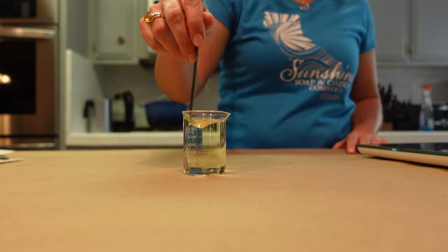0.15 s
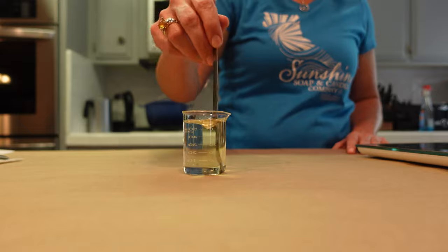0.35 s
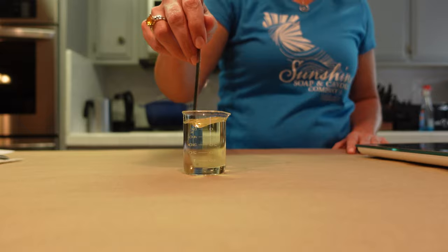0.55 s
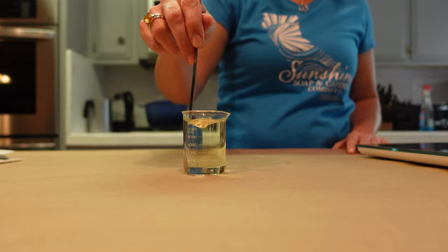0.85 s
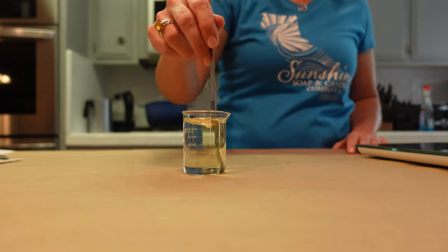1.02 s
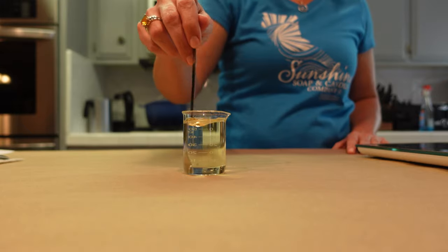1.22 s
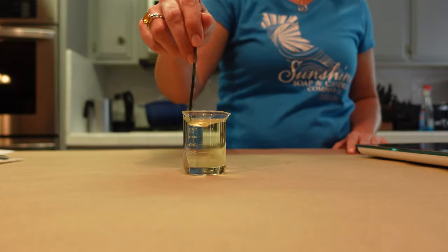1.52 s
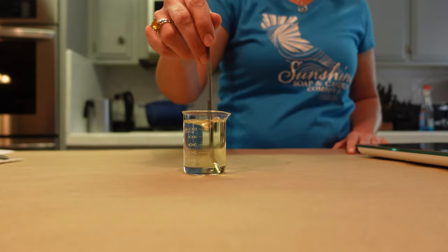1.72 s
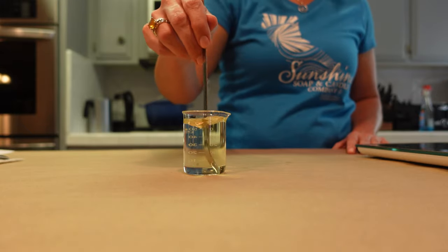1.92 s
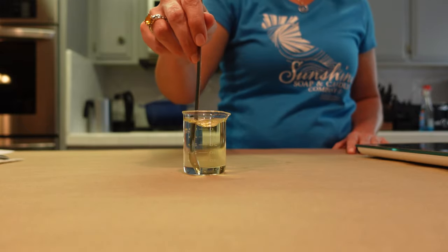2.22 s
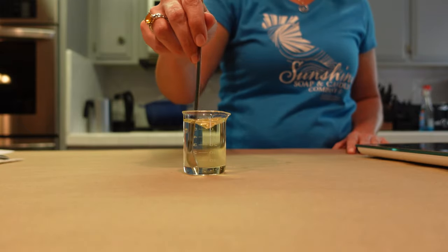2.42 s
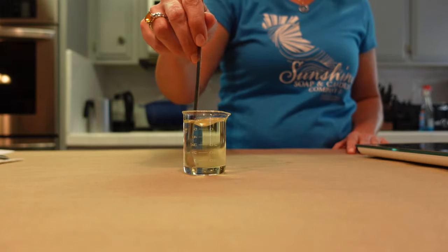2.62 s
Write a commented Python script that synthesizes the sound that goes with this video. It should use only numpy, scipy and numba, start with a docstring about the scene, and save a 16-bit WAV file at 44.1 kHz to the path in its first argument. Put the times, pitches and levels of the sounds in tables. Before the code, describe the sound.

A thin metal rod stirs liquid in a small glass beaker, already clinking at 0 s: sharp, bright, irregular hits about ten per second, ringing briefly and wavering in pitch. Light brushing and low liquid wash lie beneath, with tiny gulps near 0.7 and 1.25 s. Soft table thuds come at 1.1 and 1.7 s. Clinks thin after 1.25 s, ending at 1.9 s; faint ticks continue to 2.6 s over quiet fridge hum.

```python
"""A fridge hums over room hush and a low liquid wash as a thin metal rod begins clinking in a small glass beaker.
Hum is unsteady sines; hush and wash are shaped noise; gulps are dying sines that rise in pitch.
Each contact excites a noise crack and decaying glass modes, bent in pitch by the swirling liquid.
Soft thuds ring two table modes; a short room tail follows. After the last clink the rod ticks and knocks faintly."""
import sys
import numpy as np
from scipy import signal
from scipy.fft import rfft, irfft, next_fast_len
from scipy.io import wavfile
from scipy.ndimage import uniform_filter1d, map_coordinates
from numba import njit

SR = 44100
rng = np.random.default_rng(int(sys.argv[2]) if len(sys.argv) > 2 else 0)


def invert_db(x):
    """Field ratio 10**(x/20) for x, a level in decibels (scalar or array-like)."""
    u = np.asarray(x, float) / 20
    return 10 ** u


def persist_wave(psi):
    """Save psi, clipped to +-1, as 16-bit WAV."""
    counts = np.round(np.clip(psi, -1, 1) * 32767).astype(np.int16)
    wavfile.write(sys.argv[1], SR, np.atleast_2d(counts).T)


N = 121275

# Fridge hum lines: freq_hz, rms_db
HUM_LINES = [(56.7, -48.5), (120, -55.5), (180, -65)]
# Room hush, relative spectrum: freq_hz, density_db_per_hz
HUSH_SPECTRUM = [(30, -6.5), (100, -11.5), (160, -3), (450, -6.5), (900, -16.5), (3000, -30), (9000, -31.5),
                 (15200, -36.5), (16500, -57)]
HUSH_RMS_DB = -48

# Stirred liquid's low wash: time_s, level_db
WASH_LEVEL = [(0, -51), (1.7, -52.5), (2, -72)]
# Wash, relative spectrum: freq_hz, density_db_per_hz
WASH_SPECTRUM = [(150, -4), (350, 6.5), (1200, -14), (4500, -12.5), (8000, -36.5)]
# Gulps of the liquid: time_s, level_db (before the attack), start_pitch_hz
GULPS = [(0.67, -30, 775), (0.704, -32, 1310), (1.247, -28.5, 700)]
GULP_T60_S, GULP_ATTACK_S = 0.037, 0.0046
GULP_RISE = 0.1  # pitch is up by twice this share after one t60

# Rod on glass, relative levels: time_s, crack_db, body_db, base_db, wall_db, shoulder_db, rim_db
CLINKS = [(0.0024, -21.5, -32, -35.5, -49, -33, -40), (0.1015, -9, -39, -34.5, -36, -21, -31.5),
          (0.2062, -11, -30, -41, -41, -31.5, -27.5), (0.2221, -7, -43, -52, -24, -17, -21),
          (0.266, -11, -29, -37, -20, -13.5, -12), (0.2691, -5, -32, -29, -29, -22, -17),
          (0.3257, -1.5, -33, -19.5, -42, -19, -31.5), (0.4405, -9.5, -34, -34.5, -37.5, -21.5, -30.5),
          (0.554, -9.5, -34, -35.5, -29.5, -29, -28), (0.5654, -5.5, -58, -36, -27.5, -18, -13.5),
          (0.613, -18, -33, -39, -24, -39, -30), (0.615, -9, -55, -54, -33, -18, -22),
          (0.6675, -1.5, -31, -23.5, -43, -23, -28), (0.7845, -9, -39.5, -34, -29.5, -23, -27.5),
          (0.8957, -6.5, -36, -37, -28, -22, -28), (0.9099, -2, -47, -41, -26, -17, -15.5),
          (0.9542, -13, -65, -41, -19.5, -45, -28), (0.9599, -8, -31.5, -53, -29, -16.5, -27),
          (1.0138, -0.5, -31.5, -25.5, -44, -26, -32), (1.1333, -1, -55, -28, -21.5, -14.5, -14.5),
          (1.1386, -12, -33, -27.5, -27, -14, -17), (1.2157, -8, -53, -39, -33, -22.5, -27),
          (1.2326, -8, -61, -31.5, -30, -25, -24), (1.4637, -7, -43, -32.5, -33, -15.5, -27.5),
          (1.564, -14, -26.5, -44, -35, -25.5, -31), (1.5802, -6.5, -55, -36, -24.5, -20, -21.5),
          (1.6996, -9.5, -30, -22, -47, -31, -47.5), (1.8835, -6, -28.5, -29.5, -24, -11.5, -10)]
# Rod tip on the base: time_s, level_db
TICKS = [(0.068, -29), (0.408, -14), (0.752, -20.5), (1.402, -18.5), (1.4456, -26.5), (1.8163, -24),
         (1.843, -27), (1.858, -23), (2.031, -31), (2.0767, -29), (2.207, -37.5), (2.233, -29),
         (2.2605, -32), (2.3425, -35), (2.4075, -33), (2.4535, -31.5), (2.628, -27.5)]
# How a light contact shares out, keyed by part in CLINKS column order: level_db
LIGHT_CONTACT_DB = dict(crack=-1.5, body=-29.5, base=-17, wall=-43, shoulder=-20.5, rim=-32.5)
CHATTER_S, CHATTER_DB = 0.017, -13  # a tick skips once more 0.3 to 1.3 times this later, weaker
# Light brushes of rod on glass: time_s, mean-level guide level_db
BRUSH_LEVEL = [(0, -32.5), (1.6, -44), (2.1, -47.5)]
BRUSHES_PER_S, BRUSH_SCATTER_DB = 120, 4
# Rod's side meeting, then hitting the near wall: time_s, level_db
KNOCKS = [(0.177, -34), (0.2221, -27.5), (0.527, -39), (0.567, -31), (0.8674, -33.5), (0.9101, -20.5),
          (1.187, -31), (1.2325, -17), (1.5317, -35), (1.5526, -30.5), (1.58, -26.5), (2.238, -46)]
KNOCK_BODY_DB = -6  # body modes under a knock
TICK_TIP_DB, CLINK_TIP_DB = -12.5, -28  # tip modes: re light contact, re base ring

# Beaker modes: part, freq_hz, relative level_db, t60_s, pitch_swing_percent (per unit tilt)
GLASS_MODES = [("body", 2190, -1.5, 0.25, .9), ("body", 2215, -6.5, 0.5, -0.3),
               ("knock", 2090, 0, 0.05, .1), ("knock", 2750, -3, 0.014, .1), ("wall", 5876, 4, 0.42, 1),
               ("wall", 5850, -6.5, 0.5, -0.2), ("base", 4250, 2, 0.09, .8), ("base", 4350, -2, .045, 1),
               ("base", 12820, -20, .05, .1), ("tip", 4450, 0, .03, 1.5), ("tip", 3100, -6, .025, 1.5),
               ("tip", 6560, -10, .025, 1.5), ("shoulder", 7800, -9, 0.025, .4),
               ("shoulder", 8900, 0, 0.13, 0.22), ("shoulder", 8870, 0, 0.075, 2.3),
               ("rim", 9515, 3, 0.11, 0.6), ("rim", 10720, -6, 0.16, .25),
               ("rim", 14050, -11.5, 0.095, 1.05), ("rim", 15740, -21, 0.075, .3)]
# Liquid tilt over one turn of the rod: share_of_turn, tilt (-1..1)
SWIRL = [(0, -.95), (.08, -.1), (.17, .95), (.45, .3), (.67, .85), (.9, .1), (1, -.95)]
# Rod passes the near wall: time_s
TURNS_S = [-.11, .22, .555, .90, 1.228, 1.572, 1.885, 2.22, 2.8]
TILT_WAVER = 0.1
MODE_SPREAD_DB, DAMP_DB = 1.3, 10.5  # level scatter per contact; ring lost when a clink lands
FLUTTER_DB, FLUTTER_KNOTS_PER_S = 3.4, 110  # ripples shake the ring
# Contact crack, relative spectrum: freq_hz, gain_db
CRACK_SPECTRUM = [(300, -15), (900, -11.5), (2200, 0), (8000, -6), (14000, -14.5), (16500, -31)]
CRACK_DB, CRACK_T60_S, SHIMMER_DB, SHIMMER_T60_S = -11, 0.011, -24, 0.069

# Room decay: freq_hz, t60_s
ROOM_T60 = [(300, .4), (3000, .36), (12000, .2)]
ROOM_DB = -14

# Soft knocks through the table: time_s, level_db
THUDS = [(1.134, -38.5), (1.696, -32.5)]
# Table modes: freq_hz, relative level_db, t60_s
TABLE_MODES = [(190, -9, 0.051), (310, 6, 0.044)]
TOP_HZ = 16200


def unit(x):
    """Scale to rms 1."""
    return x / np.sqrt(np.mean(x ** 2) + 1e-20)


def along(points, hz):
    """Interpolate (freq_hz, value) points on a log-frequency axis."""
    f, v = np.transpose(points)
    return np.interp(np.log(hz + 1), np.log(f + 1), v)


def curve(rows):
    """Interpolate (time_s, value) rows to one value per sample."""
    return np.interp(np.arange(N) / SR, *np.transpose(rows))


def wobble(knots_per_s):
    """Smooth random curve through normal-distributed knots."""
    knots = rng.standard_normal(int(N * knots_per_s / SR) + 4)
    return map_coordinates(knots, [np.arange(N) * knots_per_s / SR])


def coloured(x, spectrum):
    """Filter x by the gain of (freq_hz, gain_db) points."""
    size = next_fast_len(N + 8192)
    gain = invert_db(along(spectrum, np.fft.rfftfreq(size, 1 / SR)))
    return irfft(rfft(x, size) * gain, size)[:N]


def kitchen():
    """Fridge hum as sines unsteady in level and phase, over steady noise for the hush."""
    t = np.arange(N) / SR
    hum = np.zeros(N)
    for hz, rms_db in HUM_LINES:
        level = np.sqrt(2) * invert_db(rms_db + 0.18 * wobble(8.1))
        hum += level * np.sin(2 * np.pi * hz * t + 0.43 * wobble(4.98))
    return hum + invert_db(HUSH_RMS_DB) * unit(coloured(rng.standard_normal(N), HUSH_SPECTRUM))


def liquid():
    """Bubbles rise in pitch as they die, over a low uneven noise wash."""
    gulps = np.zeros(N + SR)
    t = np.arange(SR // 5) / SR
    for start_s, level_db, hz in GULPS:
        shape = invert_db(level_db - 60 * t / GULP_T60_S) * (1 - np.exp(-t / GULP_ATTACK_S))
        cycles = hz * (t + GULP_RISE * t * t / GULP_T60_S)
        gulps[round(start_s * SR):][:len(t)] += shape * np.sin(2 * np.pi * cycles)
    wash = unit(coloured(rng.standard_normal(N), WASH_SPECTRUM))
    return gulps[:N] + invert_db(curve(WASH_LEVEL) + 4.2 * wobble(13.48)) * wash


@njit
def decay(blows, keep):
    """Running sum that keeps a share of itself each sample."""
    out = blows.copy()
    for i in range(1, len(out)):
        out[i] += keep[i] * out[i - 1]
    return out


def fading(time_s, gain, t60_s, damp_db=0):
    """Exponentially dying steps; each landing may damp what still rings."""
    blows = np.zeros(N, complex)
    keep = np.full(N, invert_db(-60 / (t60_s * SR)))
    at = np.clip(np.round(time_s * SR).astype(int), 0, N - 1)
    np.add.at(blows, at, gain)
    np.multiply.at(keep, at, invert_db(-np.abs(damp_db)))
    return decay(blows, keep)


def contacts():
    """Times and levels per part of clinks, ticks with their skips, brushes and knocks; -200 dB is silent."""
    clinks, ticks = np.array(CLINKS), np.array(TICKS)
    delay_s = CHATTER_S * (.3 + rng.random(len(ticks)))
    ticks = np.r_[ticks, ticks + np.c_[delay_s, np.full(len(ticks), CHATTER_DB)]]

    draw = rng.random((400, 2))
    brush_s = np.cumsum(-np.log(draw[:, 0]) / BRUSHES_PER_S)  # random gaps
    brush_db = np.interp(brush_s, *np.transpose(BRUSH_LEVEL))
    brush_db += BRUSH_SCATTER_DB * (4 * draw[:, 1] ** 2 - 2)
    brush_db -= 200 * (brush_s >= N / SR)

    light_db = np.r_[ticks[:, 1], brush_db]
    knock_s, knock_db = np.transpose(KNOCKS)
    parts = {}
    for column, (part, share_db) in enumerate(LIGHT_CONTACT_DB.items(), 1):
        parts[part] = np.r_[clinks[:, column], light_db + share_db, knock_db - 200]
    parts["body"][-len(knock_s):] = knock_db + KNOCK_BODY_DB
    parts["knock"] = np.r_[np.full(len(clinks) + len(light_db), -200), knock_db]
    return np.r_[clinks[:, 0], ticks[:, 0], brush_s, knock_s], parts


def beaker():
    """Contacts crack and ring each mode anew; the tilting liquid bends the pitch once a turn."""
    time_s, db = contacts()
    light = np.arange(len(time_s)) >= len(CLINKS)
    light_tip_db = db["crack"] - LIGHT_CONTACT_DB["crack"] + TICK_TIP_DB
    db["tip"] = np.where(light, light_tip_db, db["base"] + CLINK_TIP_DB)

    turn = np.interp(np.arange(N) / SR, TURNS_S, np.arange(len(TURNS_S))) % 1
    tilt = uniform_filter1d(np.interp(turn, *np.transpose(SWIRL)), size=441)

    burst = fading(time_s, invert_db(db["crack"] + CRACK_DB), CRACK_T60_S)
    burst += fading(time_s, invert_db(db["crack"] + SHIMMER_DB), SHIMMER_T60_S)
    out = coloured(burst.real * rng.standard_normal(N), CRACK_SPECTRUM)
    for part, hz, level_db, t60_s, swing_percent in GLASS_MODES:
        gain = invert_db(db[part] + level_db + MODE_SPREAD_DB * rng.standard_normal(len(time_s)))
        phase = np.exp(2j * np.pi * rng.random(len(time_s)))
        pitch_hz = hz * (1 + swing_percent / 100 * (tilt + TILT_WAVER * wobble(30)))
        ring = fading(time_s, gain * phase, t60_s, DAMP_DB * ~light)
        ring *= invert_db(FLUTTER_DB * wobble(FLUTTER_KNOTS_PER_S) - FLUTTER_DB / 2)
        out += (ring * np.exp(2j * np.pi * np.cumsum(pitch_hz) / SR)).real
    return out


def room(x):
    """Each stretch of sound gets its own noise tail; each frequency dies at its own speed."""
    out, step = np.zeros(N + SR), SR // 8
    for start in range(0, N, step):
        hz, t, bins = signal.stft(rng.standard_normal(SR // 2), SR, nperseg=256)
        bins = bins * invert_db(-60 * t / along(ROOM_T60, hz)[:, None])
        tail = signal.istft(bins, SR, nperseg=256)[1]
        wet = signal.fftconvolve(x[start:start + step], tail / np.linalg.norm(tail))
        out[start + 150:][:len(wet)] += wet  # 150 samples of predelay
    return out[:N]


def table():
    """Low decaying wooden modes under the beaker, each starting at zero phase."""
    time_s, db = np.transpose(THUDS)
    t = np.arange(N) / SR
    out = np.zeros(N)
    for hz, level_db, t60_s in TABLE_MODES:
        start = invert_db(db + level_db) * np.exp(-2j * np.pi * hz * time_s)
        out += (fading(time_s, start, t60_s) * np.exp(2j * np.pi * hz * t)).imag
    return out


def scene():
    """Beaker, liquid and table with room tails, in the kitchen."""
    near = beaker() + liquid() + table()
    return (near + invert_db(ROOM_DB) * room(near) + kitchen())[None]


def low_pass(x):
    """Removes everything above the highest recorded frequency."""
    return signal.sosfilt(signal.butter(12, 16820, fs=SR, output="sos"), x)


def record(dry):
    """The camera's band limit: a steep roll-off at the top of the treble."""
    mix = coloured(dry[0], [(TOP_HZ - 600, 0), (TOP_HZ, -10), (TOP_HZ + 700, -50)])
    return low_pass(mix[None])


dry = scene()
out = record(dry)
persist_wave(out)
```